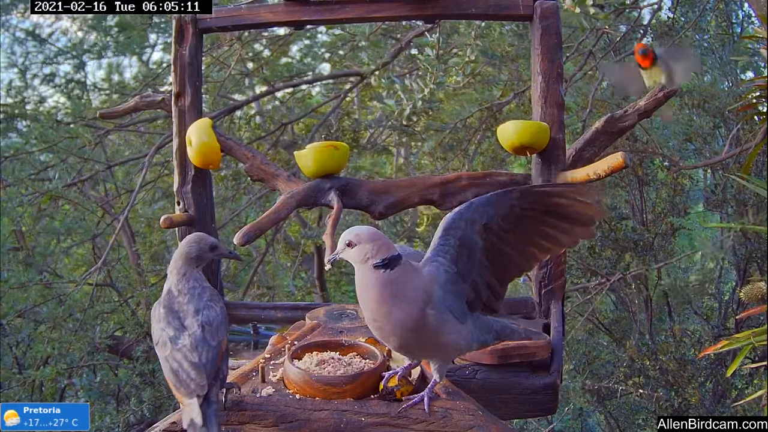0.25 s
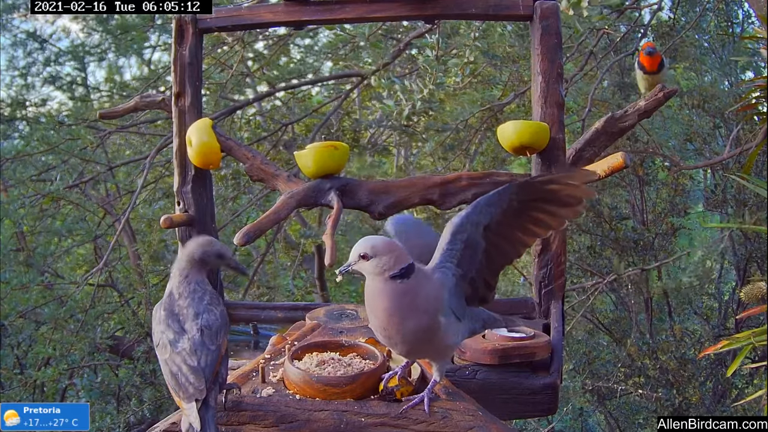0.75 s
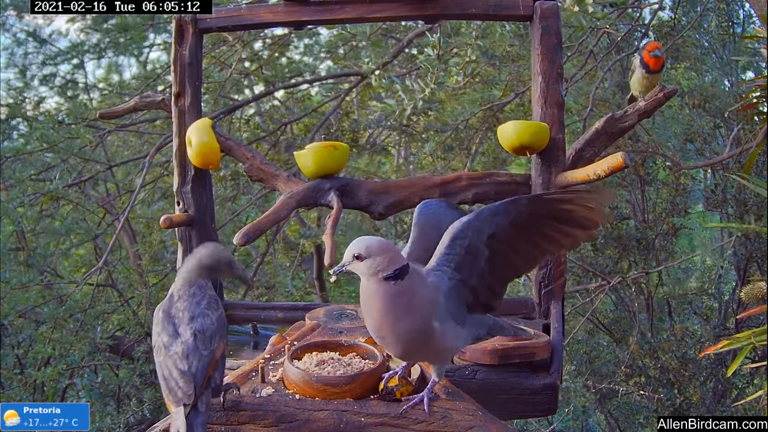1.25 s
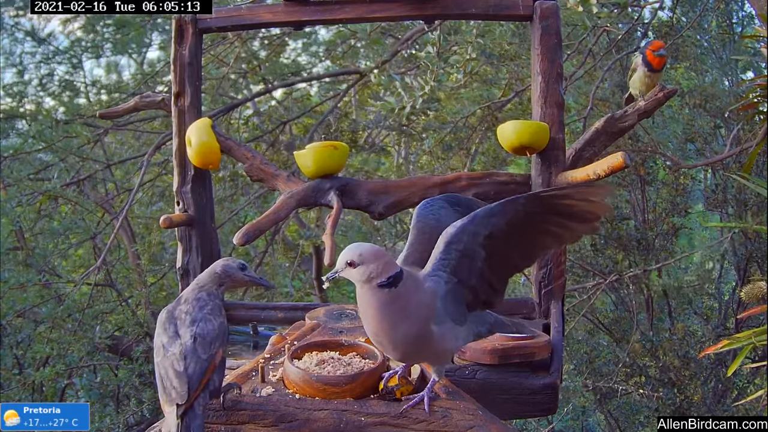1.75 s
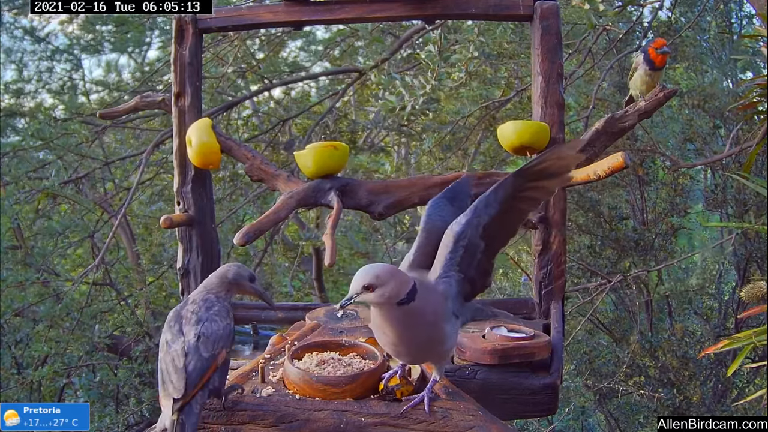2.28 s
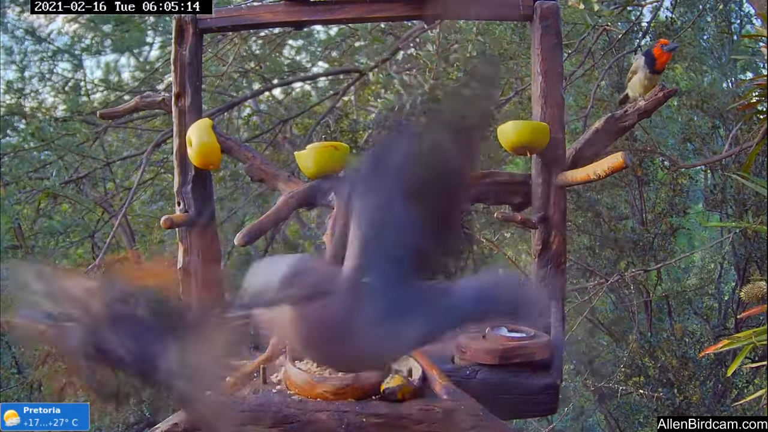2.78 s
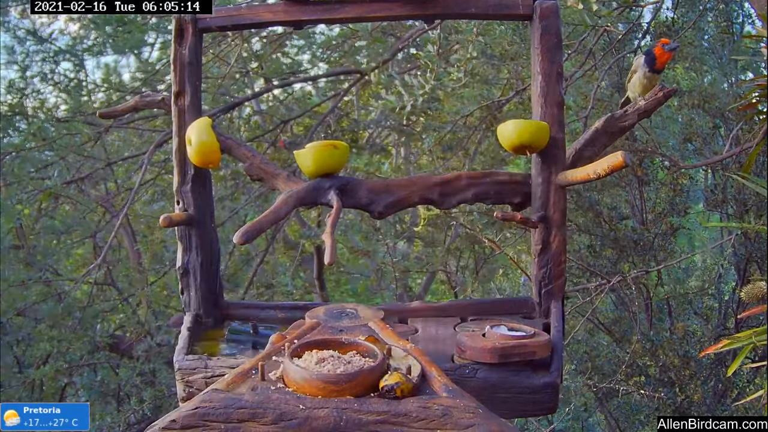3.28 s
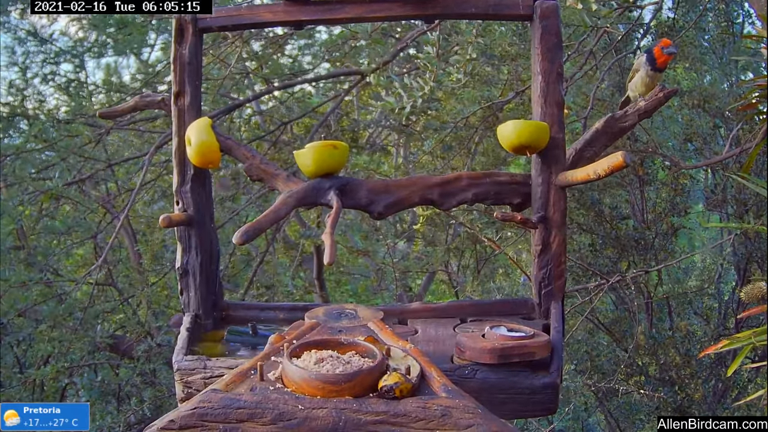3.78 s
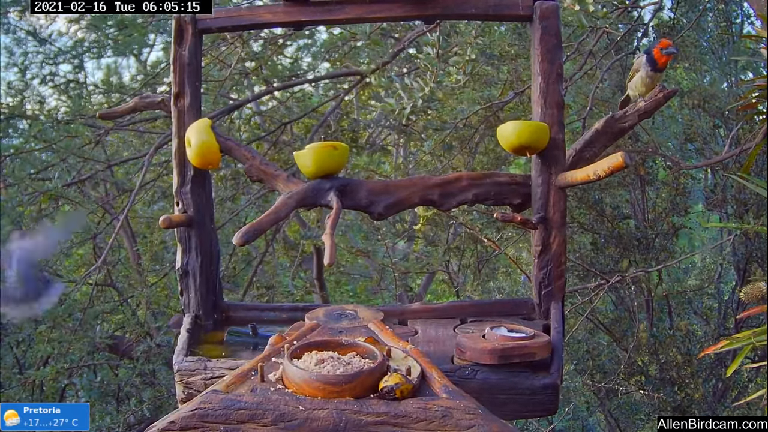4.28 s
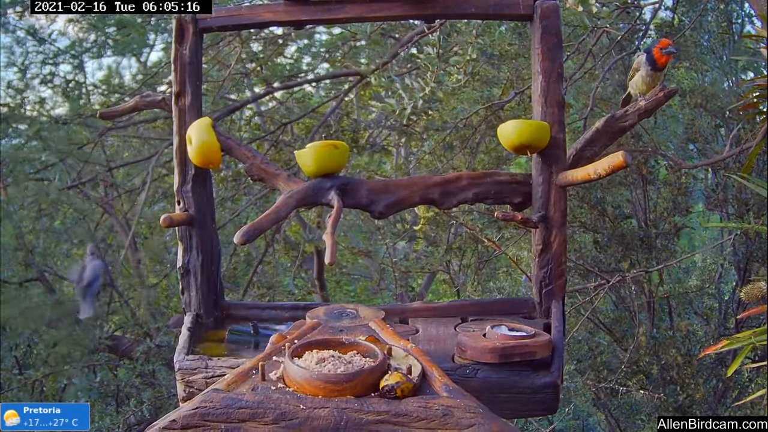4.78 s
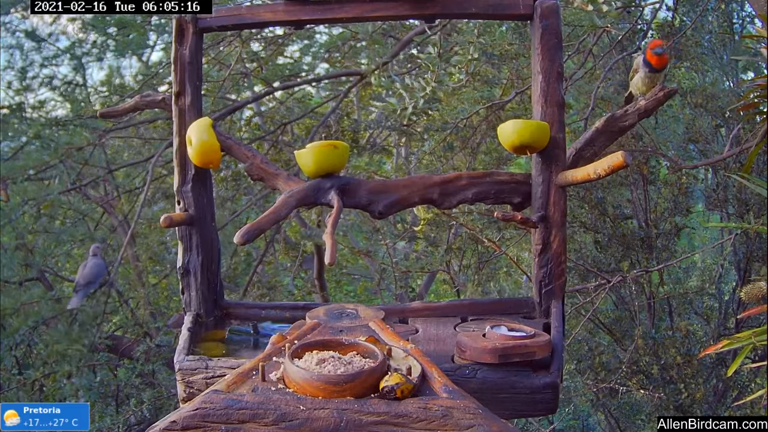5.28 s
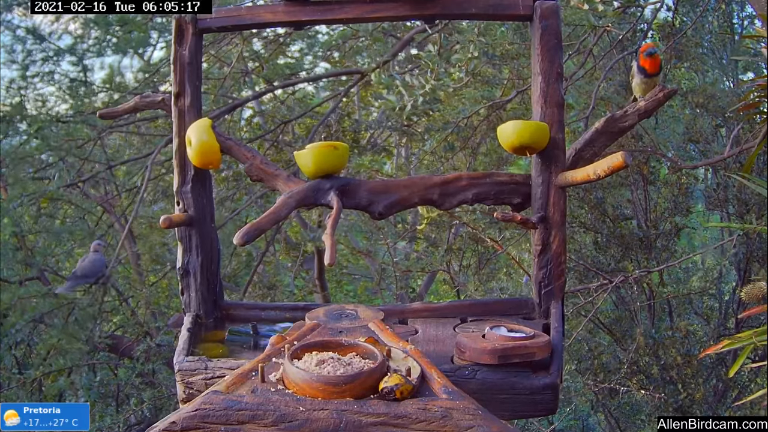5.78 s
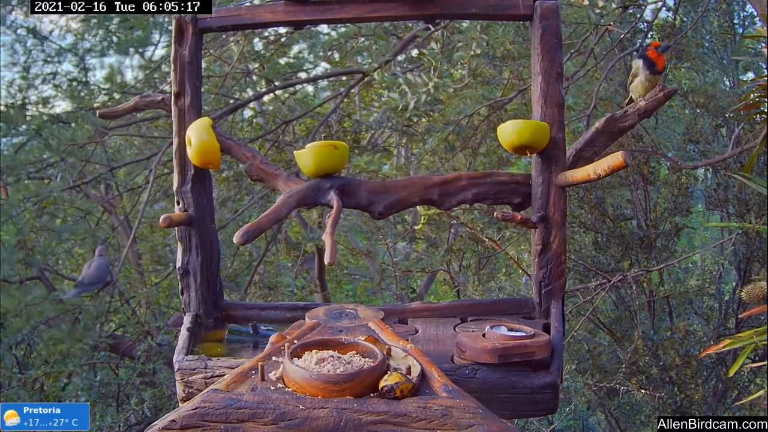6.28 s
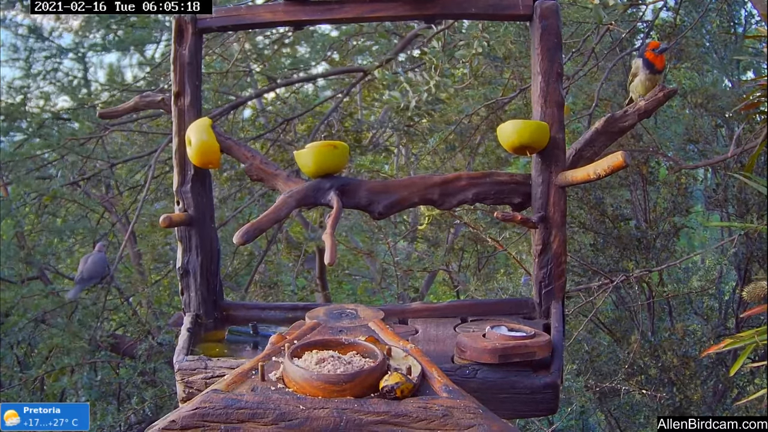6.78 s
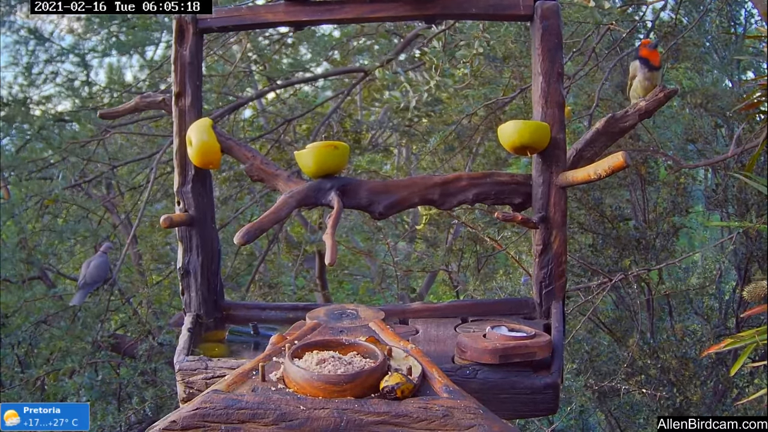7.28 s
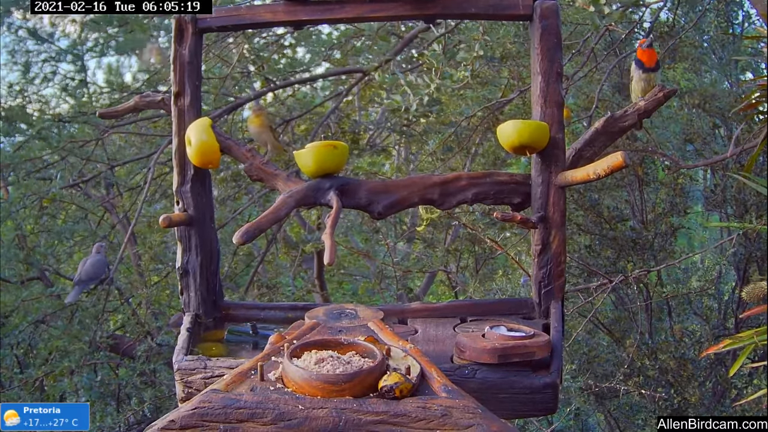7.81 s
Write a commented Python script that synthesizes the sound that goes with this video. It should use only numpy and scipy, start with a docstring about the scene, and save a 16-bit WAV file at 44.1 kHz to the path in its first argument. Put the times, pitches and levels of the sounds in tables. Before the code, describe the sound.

Sharp wing claps and fading wingbeats, two short chirps and a rasping bird scold, with a breeze buffeting the microphone.

```python
"""Doves at a garden feeder

Two doves clash with a wing clap and fly off, their wingbeats pushing air at the microphone, then fading.
A small bird whistles two sharp chirps with its voice box, ticks, then rattles out a harsh, rasping scold.
Faint birds call from the trees, which give a short echo. A light breeze buffets the microphone,
over a low hum and a dull rush that swells with the wingbeats and during the scold."""
import sys
import numpy as np
from scipy import signal
from scipy.fft import rfft, irfft, next_fast_len
from scipy.io import wavfile
from scipy.ndimage import uniform_filter1d, map_coordinates

SR = 44100
rng = np.random.default_rng(int(sys.argv[2]) if len(sys.argv) > 2 else 0)


def to_wav(sig):
    """Store sig (one row per channel, or 1-D mono) as 16-bit WAV at the path in sys.argv[1].

    Samples outside -1..1 are clipped; the rate is SR.
    """
    pcm = np.clip(np.atleast_2d(sig), -1, 1) * 32767
    pcm = np.round(pcm).astype(np.int16)
    wavfile.write(sys.argv[1], SR, pcm.T)  # frames by channels


N = 355005

# Levels are relative. A COLOUR table says how strong a sound is from low to high frequencies.
# Wings striking: start_s, level_db, fade_s (time to drop 30 dB), thud_db (compared with the slap)
CLAPS = [(0.447, -92, 0.026, 27), (2.1443, -20, 0.015, 2.5), (2.1602, -27.5, 0.013, -2),
         (2.2203, -31.5, 0.015, -1.5)]
# Quills slapping together: frequency_hz, level_db
SLAP_COLOUR = [(500, -14), (1900, -2.5), (2600, -5), (4000, 2), (5600, -0.5), (7000, 1.5), (8300, -11.5),
               (9300, -5.5), (11500, -15), (13500, -33.5), (15000, -13.5)]
# Air squeezed out by a wing: frequency_hz, level_db
THUD_COLOUR = [(50, -6), (150, 3), (450, -2.5), (1000, -4), (1500, -14), (3000, -39)]
# Feathers sweeping through the air: frequency_hz, level_db
FEATHER_COLOUR = [(400, -4), (1500, 2.5), (2400, -7), (4500, 0.5), (6500, -2.5), (8500, -14),
                  (11000, -25.5), (15000, -33.5)]
# Downstrokes near the feeder, each with a push of air, a feather flick, a rustle and a hollow whirr:
# time_s, push_db, push_width_s, flick_db, flick_width_s, rustle_db, whirr_db, whirr_delay_s
WINGBEATS = [(2.262, -15, .015, -57.5, .01, -51, -45, 0.018),
             (2.391, -13, .011, -47.5, 0.0074, -52, -35, 0.031),
             (2.511, -8.5, .0071, -48.5, 0.0095, -59.5, -36.5, -.006),
             (2.616, -17.5, .0053, -44.5, 0.0033, -59, -42.5, 0.03),
             (2.735, -28, .007, -73, 0.0068, -70, -40, 0.034),
             (2.867, -28, .0076, -56.5, 0.0049, -69.5, -49, 0.033),
             (3.012, -34, .008, -62, 0.0034, -73, -46.5, .01)]
# Soft whumps of wings further off: time_s, pitch_hz, level_db, width_s
WHUMPS = [(4.145, 237.7, -38, 0.019), (4.576, 610, -44.5, 0.0076), (4.836, 603, -44, 0.01),
          (4.888, 248.4, -38.5, .012), (4.932, 225.4, -38, .016), (6.737, 588, -38.5, 0.0075),
          (6.738, 256.3, -37, 0.0085)]

# The small bird's chirps: start_s, level_db, stretch (multiplies the length)
CHIRPS = [(1.830, -23.5, 0.94), (4.845, -30.5, .94)]
# The hooked, falling whistle that opens a chirp: time_in_chirp_s, pitch_hz, level_db
OPENING_WHISTLE = [(0, 5000, -21), (.005, 5540, -9.5), (.013, 5302, -1.5), (.023, 4607, -2),
                   (.031, 4130, 2.5), (.041, 3553, -1)]
# The other side of the voice box joining in: time_in_chirp_s, pitch_hz, level_db
SECOND_VOICE = [(.041, 7646, -14.5), (.046, 5207, -4.5), (.05, 5580, -10.5), (.055, 3900, 0),
                (.058, 5600, -1), (.066, 3970, -9.5), (.071, 6000, -16)]
# How the beak shapes a chirp: frequency_hz, gain_db
BEAK_COLOUR = [(1700, -0.5), (3000, -1.5), (4400, 0), (5600, 2), (7000, 3), (10200, 1.5), (11300, -10),
               (12500, -15.5), (16000, -10)]
# Dry ticks before the scold: time_s, level_db, width_s, treble_tilt_db_per_octave
TICKS = [(5.745, -56, 0.0042, 9), (5.7646, -47.5, 0.0026, 4), (5.8786, -36.5, .0015, 8.5),
         (5.893, -44.5, 0.0032, -9), (6.0131, -42.5, 0.0014, 9.5), (6.055, -56, 0.017, -6.5),
         (6.14, -48, 0.0016, 8.5), (6.208, -47.5, 0.013, -3), (6.22, -42, 0.0053, -0.5),
         (6.258, -40.5, 0.004, -3.5), (6.492, -49.5, .003, 0)]
# The pitches that ring in a tick: pitch_hz, width_hz, level_db
TICK_RESONANCES = [(1800, 390, -5.5), (2790, 210, 2.5), (3900, 550, -1.5), (5000, 730, -1),
                   (6000, 600, -2.5), (7260, 350, -1), (9140, 390, -12.5), (10480, 230, -8),
                   (12810, 590, -27.5)]
# Syllables of the scold: start_s, hold_s, release_s, level_db
SYLLABLES = [(6.543, .018, .042, -36), (6.683, .222, .014, -27.5), (6.983, 0.018, .02, -32.5),
             (7.07, .011, .02, -31.5), (7.144, .016, 0.028, -28)]
# Ringing pitches that move as the beak opens: multiple_of_main_pitch, width_hz, level_db
MOUTH_RESONANCES = [(1, 550, 15), (1.2, 610, 8), (1.8, 900, -3.5)]
# How the throat and open beak shape the scold: frequency_hz, gain_db
THROAT_COLOUR = [(300, -13.5), (780, 3.5), (1000, 0), (1650, 0), (2800, 1.5), (3450, -8), (4500, -2.5),
                 (6900, -2), (8150, -6), (9200, -1.5), (10400, 0.5), (11900, -8), (13200, -7.5),
                 (14000, -18), (14900, -14.5), (16000, -28.5)]
# Rushing air in the scold: frequency_hz, level_db
BREATH_COLOUR = [(900, -17), (2500, -3.5), (3500, -14), (5500, 1), (7000, 0.5), (8200, -4.5), (10400, -3),
                 (15000, -25.5)]

# Birds far off in the trees: time_s, pitch_hz, level_db, width_s, waver_hz
FAR_NOTES = [(0.401, 5610, -62.5, 0.008, 52), (0.661, 1590, -63, 0.032, 20),
             (0.798, 1541, -63.5, 0.043, 23), (.81, 3040, -78, .049, 120), (2.927, 3160, -74.5, 0.048, 140),
             (3.347, 3640, -80, 0.036, 130), (5.323, 3520, -78, .04, 149), (7.509, 3610, -72, 0.052, 120),
             (7.513, 3100, -67.5, 0.025, 80)]
# How long the trees echo: frequency_hz, fade_s (time to drop 60 dB)
TREE_ECHO = [(200, .3), (2000, 0.23), (4500, 0.23), (10000, 0.23), (15000, 0.19)]
# Strength of the wind on the microphone: time_s, level_db
WIND_LEVEL = [(0.0, -42), (0.47, -40.5), (0.81, -51), (1.03, -40.5), (1.14, -53.5), (1.46, -39.5),
              (1.84, -54.5), (2.26, -28), (2.42, -32.5), (2.49, -26.5), (2.8, -36.5), (2.85, -28),
              (2.96, -40), (4.46, -36), (4.8, -31), (4.84, -39), (5.27, -35.5), (5.38, -45.5),
              (5.49, -33.5), (5.83, -40), (5.92, -34.5), (6.7, -33), (7.08, -24.5), (7.38, -34),
              (7.42, -27), (8.05, -44)]
# The wind's deep buffeting: frequency_hz, level_db
WIND_COLOUR = [(4.7, -28.5), (8.0, 10), (16, 7), (24, -2.5), (57, -7.5), (120, -24), (168, -30), (187, -37),
               (200, -41), (260, -57.5), (440, -120)]
# Strength of the dull rush and of the drone under it: time_s, level_db
RUSH_LEVEL = [(0.0, -53.5), (0.18, -54), (1.73, -56), (2.15, -54.5), (2.35, -45.5), (3.09, -53.5),
              (3.72, -56), (4.78, -53), (6.5, -58.5), (6.95, -47.5), (7.26, -55), (8.05, -58)]
# The dull rush: frequency_hz, level_db
RUSH_COLOUR = [(60, -11), (150, -3), (320, 1), (430, -3), (590, 2), (850, -4.5), (1100, -11), (1550, -16),
               (2100, -29.5), (3000, -36), (6000, -61)]
# Moments when the low drone swells: time_s, level_db, width_s, upper_resonance_db
DRONE_SWELLS = [(0.095, -47, 0.16, -58), (.47, -47.5, 0.025, -48), (.92, -43, 0.064, -55),
                (1.589, -46.5, 0.074, -66.5), (1.781, -42.5, 0.058, -64), (2.519, -37, 0.03, -58),
                (2.907, -45, 0.064, -61), (5.281, -47.5, 0.066, -56), (5.522, -48.5, 0.054, -56),
                (6.755, -42, .06, -49.5), (7.1, -45, .06, -54), (7.386, -48, 0.12, -65.5),
                (7.934, -50, 0.089, -67)]
# The low drone, also used for the boom of a clap: frequency_hz, level_db
DRONE_COLOUR = [(120, -24.5), (190, -8.5), (232, -0.5), (262, -4), (305, -0.5), (370, -15), (520, -40.5),
                (900, -93)]
# The drone's upper resonance: frequency_hz, level_db
UPPER_DRONE_COLOUR = [(150, -90), (300, -20), (450, 2), (570, 3.5), (800, -41), (1500, -120)]
# Faint background hiss: frequency_hz, level_db
HISS_COLOUR = [(500, -16.5), (2500, -1.5), (5000, -5.5), (8000, -12.5), (12000, -23), (16000, -22)]


def wing_claps():
    """A wing squeezes the air out with a thud and a boom, its quills slap, and the feathers slide apart."""
    out = np.zeros(N)
    t = np.arange(-SR // 50, SR // 8) / SR  # the wings meet at t = 0
    for time_s, db, fade_s, thud_db in CLAPS:
        slap_shape_db = np.where(t < 0, 60 * t / .0052, -30 * t / fade_s)
        thud_shape_db = np.where(t < 0, 60 * t / .022, -60 * t / .052)
        slap = noise(SLAP_COLOUR, len(t)) * amp(slap_shape_db)
        crack = noise(SLAP_COLOUR, len(t)) * bell(t - .0003, .0009) * amp(2)
        thud = noise(THUD_COLOUR, len(t)) * amp(thud_shape_db + thud_db)
        boom = noise(DRONE_COLOUR, len(t)) * bell(t - .014, .014) * amp(-21)
        add(out, time_s + t[0], amp(db) * (slap + crack + thud + boom))
        out += centred_at(time_s + .028, swish(db - 28, width_s=.02))  # the slide
    return out


def wingbeats():
    """Each stroke flicks the wing tips, sounds a hollow whirr and leaves a rustle as the feathers settle."""
    feathers, whirrs = np.zeros(N), np.zeros(N)
    near_strokes = [(time_s, *sound) for time_s, _, _, *sound in WINGBEATS]
    for time_s, flick_db, flick_s, rustle_db, whirr_db, delay_s in near_strokes + departing_strokes():
        feathers += centred_at(time_s - .02, swish(flick_db, flick_s))
        feathers += centred_at(time_s + .015, swish(rustle_db, width_s=.028))
        whirrs += centred_at(time_s + delay_s, note(hz=855.3, db=whirr_db, width_s=.0087, waver=.082))
    brushing = unit(amp(2.1 * wobble(160) + 1.7 * wobble(900)))  # quills brush over one another
    return feathers * brushing + whirrs


def departing_strokes(count=5, beat_s=.112, fade_db_per_s=10):
    """The last near stroke repeats at an even beat, ever fainter as the doves fly away."""
    time_s, _, _, flick_db, flick_s, rustle_db, whirr_db, delay_s = WINGBEATS[-1]
    ages_s = beat_s * np.arange(1, count + 1)
    losses_db = 6 + fade_db_per_s * ages_s
    return [(time_s + age, flick_db - loss, flick_s, rustle_db - loss, whirr_db - loss, delay_s)
            for age, loss in zip(ages_s, losses_db)]


def swish(db, width_s):
    """Feathers sweep through the air, each time with their own colour."""
    t = around(width_s)
    air = vary_colour(noise(FEATHER_COLOUR, len(t)), depth_db=3, spacing_hz=450)
    return amp(db) * bell(t, width_s) * air


def wing_gusts():
    """Each near downstroke pushes air at the microphone and leaves a longer suction behind."""
    t = clock()
    return sum(amp(db) * (bell(t - time_s, width_s) - .55 * bell(t - time_s - .032, .023))
               for time_s, db, width_s, *_ in WINGBEATS)


def wing_whumps():
    """Wings further off make soft, hollow notes."""
    return sum(centred_at(time_s, note(hz, db, width_s, waver=.077)) for time_s, hz, db, width_s in WHUMPS)


def chirps():
    """Both sides of the voice box together make a sharp, buzzy 'tchip', shaped by the beak."""
    out = np.zeros(N)
    for start_s, db, stretch in CHIRPS:
        first = whistle(OPENING_WHISTLE + warble(), stretch, overtone_db=-24.5, jitter=.052)
        second = whistle(SECOND_VOICE, stretch, overtone_db=-27, jitter=.093)
        add(out, start_s, amp(db - 2) * first)
        add(out, start_s + stretch * SECOND_VOICE[0][0], amp(db - 6.5) * second)
    return ring_through(out, BEAK_COLOUR)


def whistle(shape, stretch, overtone_db, jitter):
    """One side of the voice box: a gliding tone with weak overtones, turning rough once both sides sound."""
    t = np.arange(shape[0][0], shape[-1][0], 1 / (SR * stretch))
    hz, db = curves(shape, t)
    roughness = np.clip((t - SECOND_VOICE[0][0]) / .0072, .1, 1)
    flutter, shimmer = unit(uniform_filter1d(rng.standard_normal((2, len(t))), size=24))
    phase = 2 * np.pi * np.cumsum(hz * (1 + jitter * roughness * flutter)) / SR
    tone = np.sin(phase) + amp(overtone_db) * (np.sin(2 * phase) + amp(-5) * np.sin(3 * phase))
    soft_edges = signal.windows.tukey(len(t), .05)
    return np.sqrt(2) * amp(db + 2.3 * roughness * shimmer) * tone * soft_edges


def warble(count=7, start_s=.047, period_s=.012, fade_db_per_s=170):
    """A chirp ends by swinging between a weak low note and a strong high one, fading as it goes."""
    low, high = (2750, -15.5), (4900, 3.4)  # pitch_hz, level_db
    ages_s = np.arange(count) * period_s / 2
    return [(start_s + age, hz, db - fade_db_per_s * age)
            for age, (hz, db) in zip(ages_s, [low, high] * count)]


def ticks():
    """Short dry notes: a spiky burst with a quick start rings a few pitches, differently each time."""
    def colour(hz, tilt_db):
        ringing = sum((-1) ** k * amp(db) * 1j * hz * width / (pitch ** 2 - hz ** 2 + 1j * hz * width)
                      for k, (pitch, width, db) in enumerate(TICK_RESONANCES))
        return ringing * amp(tilt_db * np.log2(hz + 1)) / (1 + (hz / 13000) ** 8)

    out = np.zeros(N)
    for time_s, db, width_s, tilt_db in TICKS:
        t = around(2 * width_s)
        grit = rng.standard_normal(len(t)) * rng.exponential(size=len(t))
        burst = filtered(grit, lambda hz: colour(hz, tilt_db))
        burst = vary_colour(burst, depth_db=4, spacing_hz=500)
        rise_and_fall = np.where(t < 0, bell(t, 1.07 * width_s), np.exp(-t / (1.52 * width_s)))
        add(out, time_s + t[0], amp(db) * burst * rise_and_fall)
    return out


def scold():
    """The two sides of the voice box rattle at different rates, with a little rushing air."""
    db, pulse_hz, throat_hz = scold_effort()
    strong = rasp(db, pulse_hz, throat_hz, jitter=.02, scatter_db=2.2)
    weak = rasp(db, .87 * pulse_hz, throat_hz, jitter=.07, scatter_db=2)
    breath = amp(db - 17.5) * noise(BREATH_COLOUR)
    return ring_through(strong + amp(-4) * weak, THROAT_COLOUR) + breath


def scold_effort(attack_s=.011, attack_db=48, release_db=22, full_db=-27, opening_hz_per_s=5400):
    """Each syllable rises, holds and falls; the pulse rate and the throat's ring follow that effort."""
    shape = []  # time_s, level_db, age_s
    for start_s, hold_s, release_s, db in SYLLABLES:
        length_s = hold_s + release_s
        shape += [(start_s - attack_s, db - attack_db, 0),
                  (start_s, db, 0),
                  (start_s + hold_s, db, hold_s),
                  (start_s + length_s, db - release_db, length_s),
                  (start_s + length_s + attack_s, db - release_db - attack_db, length_s)]
    t = clock()
    db, age_s = curves(shape, t)
    effort_db = np.maximum(db - full_db, -release_db)
    pulse_hz = 418 * 2 ** (effort_db / 42) * (1 + .06 * wobble(45))
    throat_hz = 5275 + 24 * effort_db + opening_hz_per_s * age_s  # also rises as the beak opens
    sounding = (t > shape[0][0]) & (t < shape[-1][0])
    level_db = np.where(sounding, db + .75 * wobble(50), -np.inf)
    return level_db, pulse_hz, throat_hz


def rasp(level_db, pulse_hz, throat_hz, jitter, scatter_db, wide_open_hz=5770):
    """A thin skin in the voice box snaps over and over, and each snap makes the mouth ring."""
    cycles = np.cumsum(pulse_hz * (1 + jitter * wobble(300))) / SR
    new_cycle = np.diff(np.floor(cycles), prepend=0) > 0
    multiple, width_hz, ring_db = np.transpose(MOUTH_RESONANCES)[:, :, None]
    out, t = np.zeros(N), np.arange(SR // 200) / SR
    ring_fade = amp(ring_db) * 2 * np.pi * width_hz / SR * np.exp(-np.pi * width_hz * t)
    for snap in np.flatnonzero(new_cycle & np.isfinite(level_db)):
        rings = ring_fade * np.cos(2 * np.pi * multiple * throat_hz[snap] * t)
        dullness = np.clip((wide_open_hz - throat_hz[snap]) / 2400, 0, .45)  # a less open beak is duller
        pulse = np.convolve((t == 0) + rings.sum(axis=0), [dullness, 1, dullness])
        gain = amp(level_db[snap] + scatter_db * rng.standard_normal()) * np.sqrt(SR / pulse_hz[snap])
        add(out, snap / SR, gain * pulse / np.linalg.norm(pulse))
    return out


def far_birds():
    """Faint wavering notes come from deep in the trees."""
    return sum(centred_at(time_s, note(hz, db, width_s, waver=waver_hz / hz))
               for time_s, hz, db, width_s, waver_hz in FAR_NOTES)


def feeder_echo(sound, count=10):
    """The posts and tray of the feeder throw back weak early copies."""
    out = np.zeros(N)
    for delay_s, sign in zip(rng.uniform(.002, .024, count), rng.choice([-1, 1], count)):
        add(out, delay_s, sign * sound / np.sqrt(count))
    return out


def tree_echo(sound, build_s=.00597):
    """Trunks and leaves scatter a sound into a short tail."""
    hz, t, bands = signal.stft(rng.standard_normal(SR // 2), SR, nperseg=256)
    fade = amp(-60 * t / along(TREE_ECHO, hz)[:, None])
    build_up = 1 - np.exp(-t / build_s)
    tail = signal.istft(bands * fade * build_up, SR, nperseg=256)[1]
    return signal.fftconvolve(sound, tail / np.linalg.norm(tail))[:N]


def breeze():
    """Uneven gusts buffet the microphone."""
    wind_db, = curves(WIND_LEVEL, clock())
    wind = noise(WIND_COLOUR)
    audible_level = np.std(filtered(wind, lambda hz: hz > 20))
    return wind / audible_level * amp(wind_db - 1.5 + 1.5 * wobble(12))


def low_rush():
    """A dull rush and drone swell with the wingbeats and during the scold; the drone also surges briefly."""
    t = clock()
    rush_db, = curves(RUSH_LEVEL, t)
    swell_power = sum((amp(db) * bell(t - time_s, width_s)) ** 2 for time_s, db, width_s, _ in DRONE_SWELLS)
    upper_gain = sum(amp(db) * bell(t - time_s, width_s) for time_s, _, width_s, db in DRONE_SWELLS)
    drone = patchy(noise(DRONE_COLOUR), depth_db=1.5) * np.sqrt(amp(rush_db - 1) ** 2 + swell_power)
    upper = noise(UPPER_DRONE_COLOUR) * upper_gain
    rush = patchy(noise(RUSH_COLOUR), depth_db=3.5) * amp(rush_db + 2.63 + .89 * wobble(14))
    return drone + upper + rush


def hum(pitch_hz=114):
    """A low tone wavers a little in level and pitch."""
    return amp(-53.5 + 2 * wobble(6)) * np.sin(2 * np.pi * np.cumsum(pitch_hz + wobble(7)) / SR)


def amp(db):
    """Turn decibels into a number to multiply by."""
    return 10 ** (np.asarray(db) / 20)


def unit(sound):
    """Scale to an average (rms) level of 1."""
    return sound / np.sqrt(np.mean(sound ** 2) + 1e-20)


def along(points, hz):
    """Read between the rows of a frequency table, with octaves evenly spaced."""
    table_hz, values = np.transpose(points)
    return np.interp(np.log(hz + 1), np.log(table_hz + 1), values)


def clock():
    """The time of each sample, in seconds."""
    return np.arange(N) / SR


def curves(rows, t):
    """Read each value column of a time table at the times t."""
    times_s, *columns = np.transpose(rows)
    return [np.interp(t, times_s, column) for column in columns]


def wobble(points_per_s):
    """A smooth curve through random points."""
    points = rng.standard_normal(int(N * points_per_s / SR) + 4)
    return map_coordinates(points, [clock() * points_per_s])


def bell(t, width_s):
    """A smooth swell around t = 0."""
    return np.exp(-.5 * (t / width_s) ** 2)


def around(width_s):
    """Sample times that cover a swell of this width."""
    return np.arange(-4 * width_s, 4 * width_s, 1 / SR)


def note(hz, db, width_s, waver):
    """A brief swelling tone whose pitch wanders by the fraction waver."""
    t = around(width_s)
    drift = map_coordinates(rng.standard_normal(len(t) // 100 + 4), [np.arange(len(t)) / 100])
    phase = 2 * np.pi * np.cumsum(hz * (1 + waver * drift)) / SR
    return amp(db) * np.sqrt(2) * bell(t, width_s) * np.sin(phase)


def noise(colour, size=N):
    """Noise with the given colour, at level 1."""
    return unit(filtered(rng.standard_normal(size), lambda hz: amp(along(colour, hz))))


def filtered(sound, response):
    """Turn each frequency up or down by response(hz)."""
    size = next_fast_len(len(sound) + 8192)
    return irfft(rfft(sound, size) * response(np.fft.rfftfreq(size, 1 / SR)), size)[:len(sound)]


def ring_through(sound, colour):
    """Colour a sound so that it rings only after each pulse, never before."""
    size = 2 * next_fast_len(N // 2 + 4096)
    log_gain = np.log(amp(along(colour, np.fft.rfftfreq(size, 1 / SR))))
    index = np.arange(size)
    fold = 1 + np.sign(size / 2 - index) * (index > 0)  # moves early ringing to after the pulse
    response = np.exp(rfft(irfft(log_gain, size) * fold))
    return irfft(rfft(sound, size) * response, size)[:N]


def vary_colour(sound, depth_db, spacing_hz):
    """Give one short sound its own random peaks and dips of colour."""
    bumps_db = depth_db * rng.standard_normal(128)
    return unit(filtered(sound, lambda hz: amp(map_coordinates(bumps_db, [hz / spacing_hz], mode="mirror"))))


def patchy(sound, depth_db):
    """Let small patches of pitch and time swell and sink."""
    bands = signal.stft(sound, nperseg=1024)[2]
    patches = uniform_filter1d(rng.standard_normal(bands.shape), size=3, axis=0)
    patches = uniform_filter1d(patches, size=4, axis=1)
    return unit(signal.istft(bands * amp(depth_db * unit(patches)), nperseg=1024)[1][:N])


def add(track, start_s, sound):
    """Mix a sound into a track from start_s on."""
    start = max(round(start_s * SR), 0)
    part = track[start:start + len(sound)]
    part += sound[:len(part)]


def centred_at(time_s, sound):
    """A track that holds one sound, with its middle at time_s."""
    out = np.zeros(N)
    add(out, time_s - len(sound) / (2 * SR), sound)
    return out


def scene():
    """All the birds, each with its share of echo, over the garden's background."""
    wings = wing_claps() + wingbeats() + wing_whumps()
    chirp, tick, harsh, far = chirps(), ticks(), scold(), far_birds()
    to_feeder = amp(-7.5) * chirp + amp(-19) * harsh
    to_trees = amp(-16.5) * wings + amp(-9) * chirp + amp(-11) * tick + amp(-19.5) * harsh + amp(-3) * far
    birds = wings + chirp + tick + harsh + far + feeder_echo(to_feeder) + tree_echo(to_trees)
    background = breeze() + low_rush() + hum() + amp(-78.5) * noise(HISS_COLOUR)
    return (birds + wing_gusts() + background)[None]


def record(dry):
    """The microphone loses the slowest pressure swings and the very highest treble."""
    low_hz, top_hz = 4, 15850
    return np.array([filtered(track, lambda hz: hz / np.hypot(hz, low_hz) * (hz < top_hz)) for track in dry])


dry = scene()
out = record(dry)
to_wav(out)
```